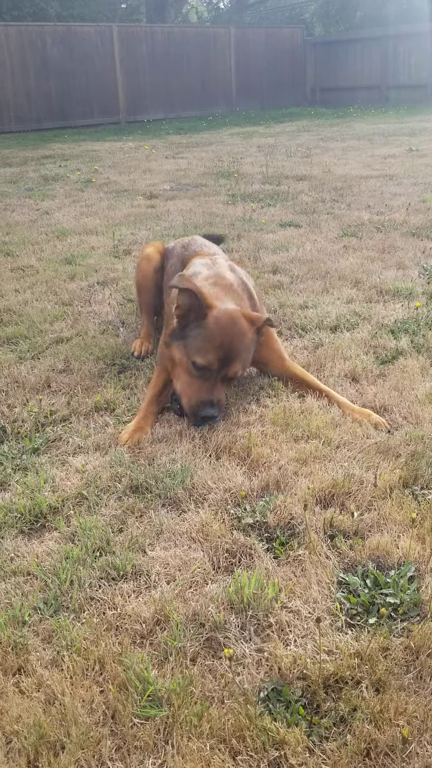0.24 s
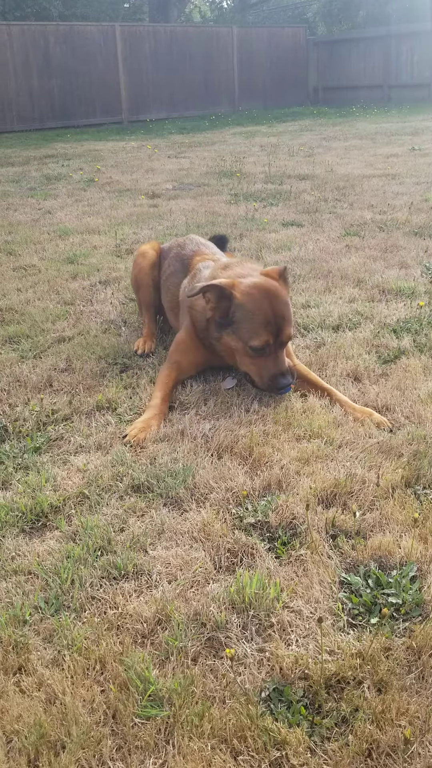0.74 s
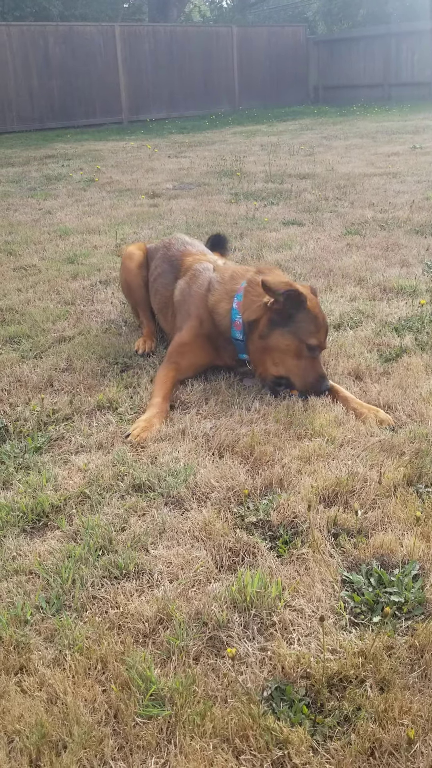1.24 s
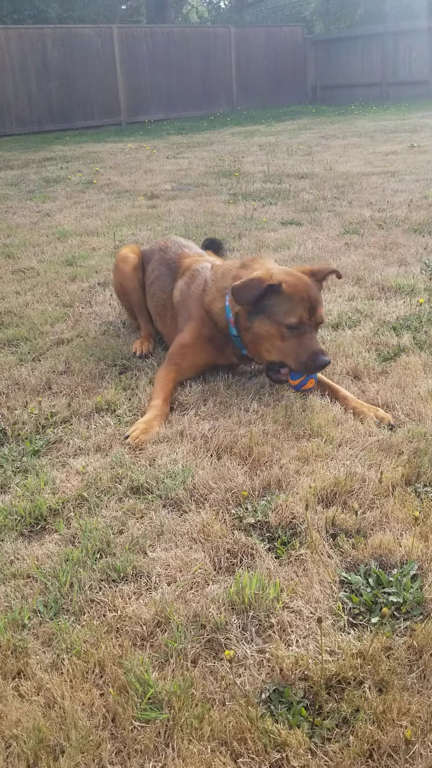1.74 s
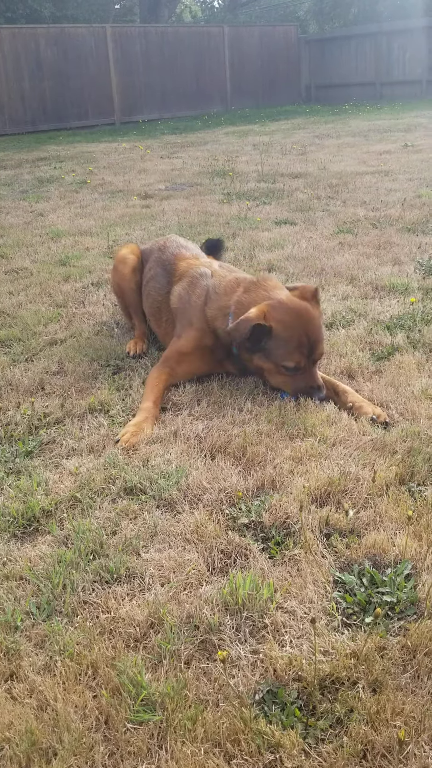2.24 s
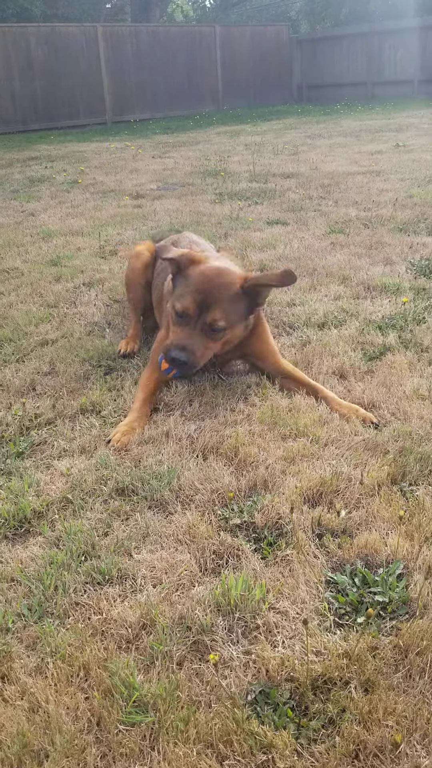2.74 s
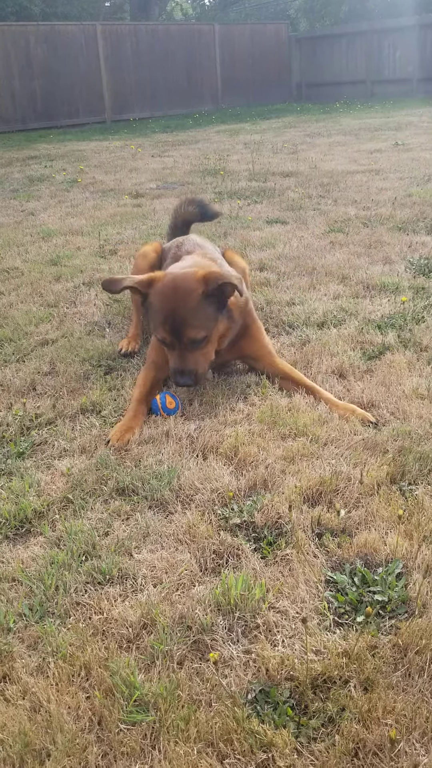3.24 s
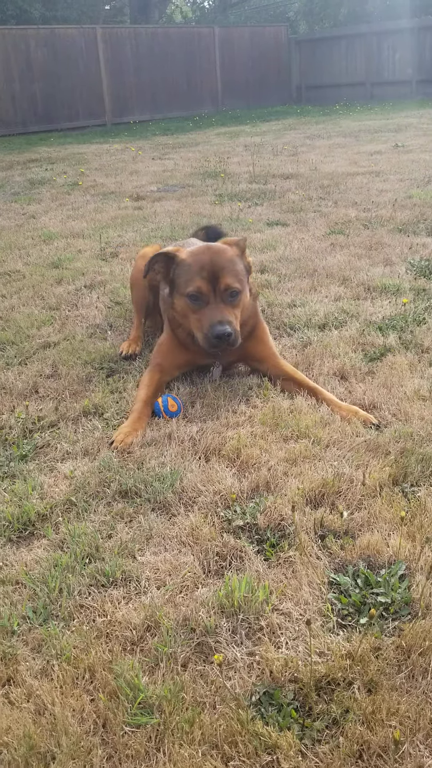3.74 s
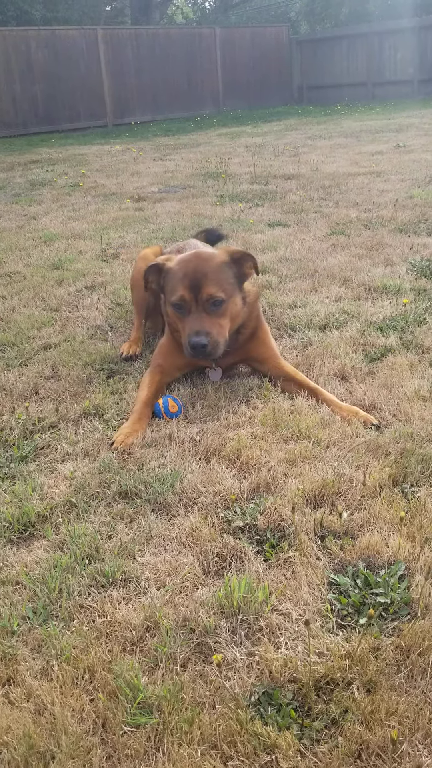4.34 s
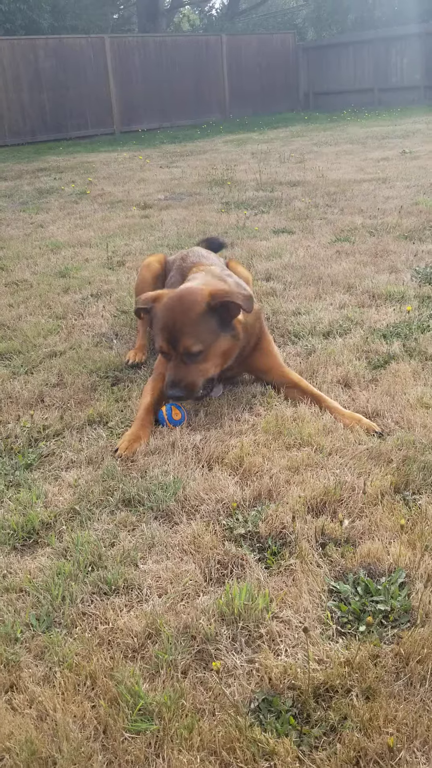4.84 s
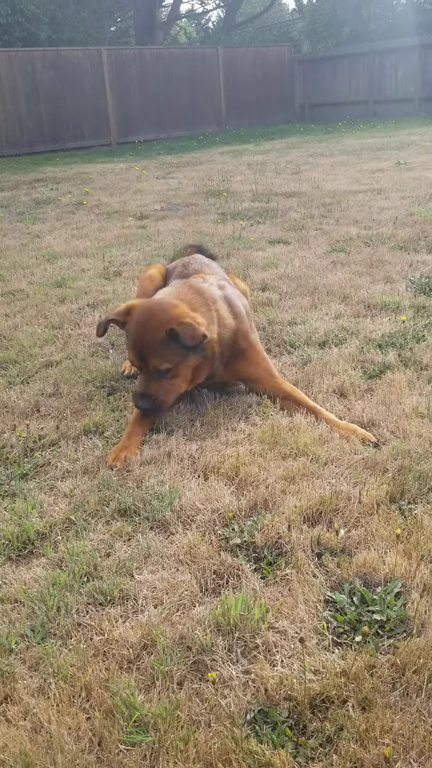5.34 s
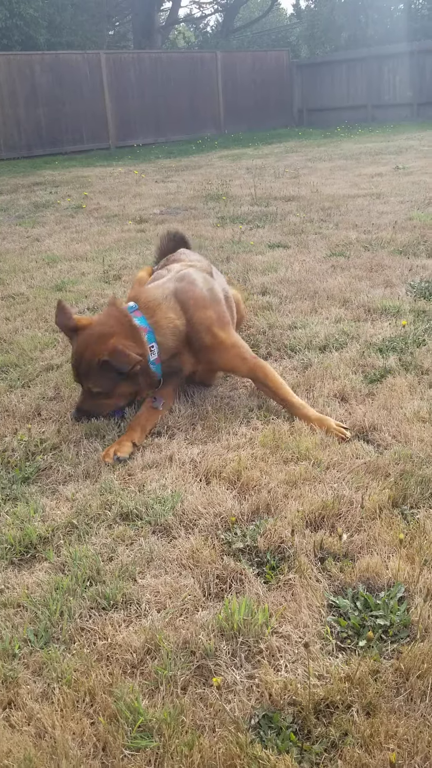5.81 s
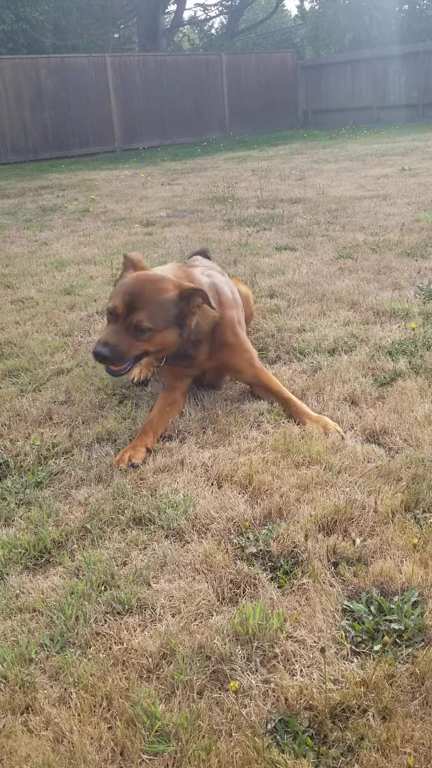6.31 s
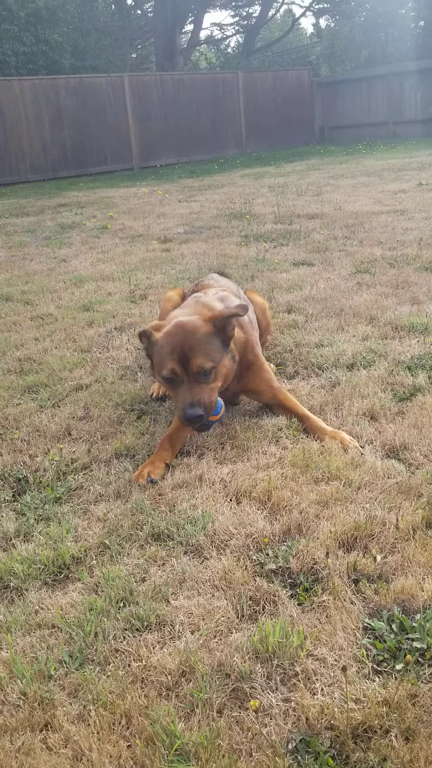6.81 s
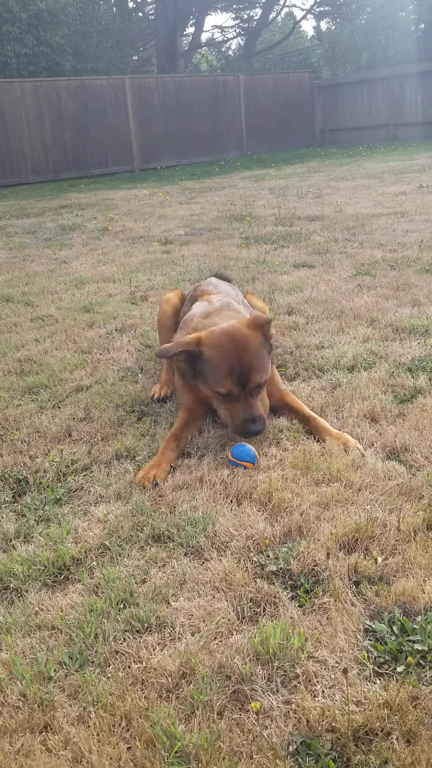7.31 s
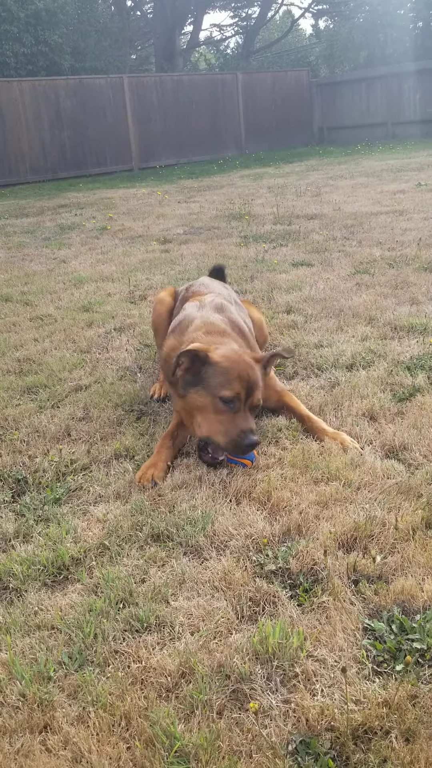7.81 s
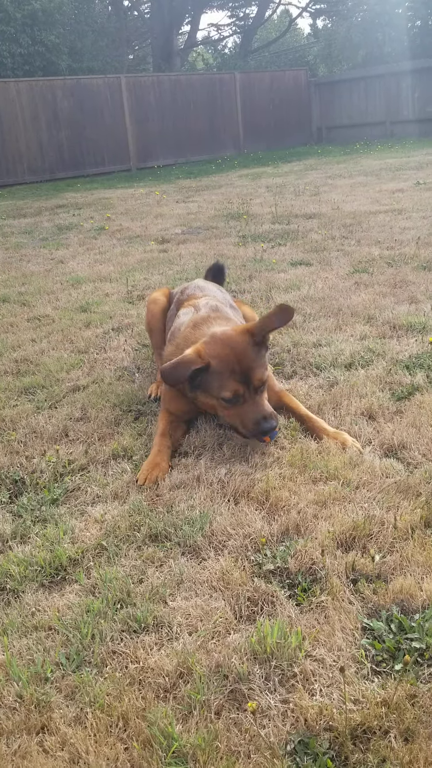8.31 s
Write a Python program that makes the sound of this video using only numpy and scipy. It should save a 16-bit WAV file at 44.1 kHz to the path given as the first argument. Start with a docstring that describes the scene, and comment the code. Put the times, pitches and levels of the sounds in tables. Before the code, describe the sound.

A dog on dry grass chews a rubber squeaker ball in bursts of squeaks and wheezes, collar tags clinking, while a vehicle approaches far behind.

```python
"""Dog with a squeaker ball

A dog lying on a dry lawn chews a rubber squeaker ball. Each bite and release drives air past a reed,
whose pitch slides between a low buzz and a thin whistle, with chatter and wheeze in the same ball.
Two collar tags clink as sums of decaying modes; knocks, snorts and grass are shaped noise.
Behind, a distant vehicle draws nearer with roar, rumble, drone and whine, and gusts bump the microphone."""
import sys
import numpy as np
from scipy import signal
from scipy.fft import rfft, irfft
from scipy.io import wavfile
from scipy.ndimage import uniform_filter1d

SR = 44100
rng = np.random.default_rng(int(sys.argv[2]) if len(sys.argv) > 2 else 0)


def transcribe(signal):
    """Save signal, clipped to [-1, 1], as a 16-bit WAV file at the path in sys.argv[1]."""
    frames = np.atleast_2d(signal).T
    limited = np.clip(frames, -1, 1)
    pcm = np.round(limited * 32767).astype(np.int16)
    wavfile.write(sys.argv[1], SR, pcm)


N = 377496
EDGE_HZ = 16100  # upper limit of the sound
TIME, BINS = np.arange(N) / SR, np.fft.rfftfreq(N, 1 / SR)  # seconds and Hz

# Squeezes and releases of the ball. Each row: start, rise and fall in seconds, flatness of the crest,
# first, crest and last pitch in Hz, relative level of the rise, crest and fall in dB.
STROKES = [(0.811, 0.013, 0.017, 0.52, 2290, 4700, 5400, -41, -41, -33.5),
           (1.122, 0.0052, 0.13, 2.07, 5400, 5330, 2105.0, -41, -42.9, -41.5),
           (1.255, 0.045, 0.089, 1.21, 2182, 4230, 1148.0, -38.7, -44, -36.5),
           (1.586, 0.042, 0.022, 0.6, 1037, 2757, 1315.0, -37.5, -32.5, -39.5),
           (1.655, 0.033, 0.17, 1.6, 1217, 4726.0, 1075.0, -33.5, -32.5, -36.0),
           (2.323, 0.042, 0.023, 1.15, 1270, 4596, 2258.0, -32.5, -33, -35.2),
           (2.484, 0.011, 0.038, 0.66, 1925, 4096, 5500.0, -37.5, -27.5, -36),
           (2.628, 0.0028, 0.0061, 0.92, 3200, 2700, 1900, -36, -42, -42),
           (2.642, 0.03, 0.075, 2.3, 1900, 4860, 3750, -27, -32.5, -36),
           (2.747, 0.008, 0.01, 0.95, 2970, 2580, 1700, -24.5, -13, -27.5),
           (2.767, 0.0353, 0.0357, 0.86, 1326, 1219.0, 1131.0, -16, -26.5, -34.5),
           (5.116, 0.029, 0.031, 1.74, 1303.0, 2198.0, 1304.0, -34.5, -31.5, -32.7),
           (5.168, 0.023, 0.012, 1.4, 1281.0, 2330, 2760.0, -30.6, -32, -33.5),
           (5.201, 0.032, 0.021, 1.04, 1968, 2731.0, 1200.0, -25, -23, -28),
           (5.256, 0.043, 0.047, 1.64, 1257.0, 5240, 1051.0, -26.5, -39.5, -28),
           (5.347, 0.032, 0.029, 1.1, 1517.0, 4863.0, 1289.0, -26, -30.5, -26),
           (5.405, 0.029, 0.046, 1.97, 1220, 4970, 5255.0, -25.0, -34.6, -49),
           (5.479, 0.2624, 0.0676, 0.5, 5170, 4010, 1174.0, -50, -49, -41.5),
           (6.785, 0.0279, 0.028, 0.93, 1266, 1230, 1116.0, -25, -29.5, -27),
           (7.944, 0.021, 0.024, 1.07, 863, 881, 776.0, -23.5, -24.5, -29.5),
           (8.014, 0.03, 0.022, 1.16, 955, 1745, 896.0, -22, -17.5, -21.5),
           (8.069, 0.018, 0.023, 0.85, 1252, 2478.0, 1091.0, -20.5, -24.5, -21.5),
           (8.114, 0.047, 0.016, 1.4, 860, 1125, 999.0, -31.5, -21, -18),
           (8.175, 0.051, 0.018, 0.89, 996, 2523, 1145.0, -21, -27.5, -21),
           (8.245, 0.021, 0.0068, 0.81, 1172.0, 3850.0, 4998.0, -24.2, -30, -27),
           (8.44, 0.069, 0.063, 1, 5357.0, 5050, 5174.0, -45, -37, -38.5)]
# How jaws and lips hold the ball. Each row: valid from in seconds,
# shading in dB at 1.2 kHz, at 5 kHz and at 14 kHz, rasp from 0 to 1.
GRIP = [(.7, 0, 10, 0, 1), (1.0, -5, 2, 8, 0.3), (1.5, 16.5, 2, 15.5, 0.36), (2.2, 1, -1, -6, 1),
        (2.44, -2, 6, -6, 0.9), (2.58, -18, -14.5, -4, 0.07), (5.0, 6, -2, -5, 0.27),
        (5.23, 3, -12, -10, 0.4), (6.5, 7.5, -13.5, -3, 0.01), (7.8, 10, 4.5, 10, 0.4),
        (7.99, 6.5, 7, 6.5, 0.1), (8.35, 0, -6, 7, .2)]


def squeaker(tone_db=0, wheeze_db=-21):
    """Reed excitation: pressure strokes sound the reed, and leaking air wheezes through the same tube."""
    tone, leak = np.zeros((2, N))
    for start, *shape in STROKES:
        grip = [row[1:] for row in GRIP if row[0] <= start][-1]  # the latest hold
        pitch, db = stroke(*shape)
        sound, air = reed(pitch, db, grip)
        add(tone, start, sound)
        add(leak, start, air)
    wheeze = leak * colour(rng.standard_normal(N), TUBE_COLOUR)
    return amp(tone_db) * tone + amp(wheeze_db) * wheeze


# Response of the reed. Each row: pressure from 0 to 1, pitch in Hz, relative loudness in dB.
REED_RESPONSE = [(0.0, 778, -4), (0.111, 1053, -4), (0.29, 1301, -3), (0.382, 1591, -6.5), (0.467, 2149, 3),
                 (0.556, 2627, 2.5), (0.613, 3005, 4.4), (0.667, 3850.0, -5.4), (0.78, 4512, 1.3),
                 (0.886, 5032, -5.5), (0.999, 5390, -12.5)]
CREST_FROM, CREST_FULL = 0.21, 0.92  # shares of the way to the crest pitch where its level takes over
START_S, STOP_S, SLACK_DB = 0.0044, 0.0098, -9  # at low pressure the reed is weak as it starts and stops
SKIP_HZ, SKIP_WIDTH_HZ, SKIP_DB = 3480, 260, -10  # the level dips where the reed skips to the whistle


def stroke(rise, fall, flatness, first_hz, crest_hz, last_hz, rise_db, crest_db, fall_db):
    """Pressure control: an arch of air pressure sets the reed's pitch (Hz) and level (dB)."""
    pressures, pitches, loudness = np.transpose(REED_RESPONSE)
    t = np.arange(-rise, fall, 1 / SR)  # zero at the crest
    rising = t < 0
    arch = np.cos(np.pi / 2 * abs(t / np.where(rising, rise, fall)) ** flatness) ** 2
    foot_hz = np.where(rising, first_hz, last_hz)
    foot_db = np.where(rising, rise_db, fall_db)
    foot_pressure = np.interp(foot_hz, pitches, pressures)
    crest_pressure = np.interp(crest_hz, pitches, pressures)
    pressure = (1 - arch) * foot_pressure + arch * crest_pressure
    pitch = np.interp(pressure, pressures, pitches)
    way = (pitch - foot_hz) / (crest_hz - foot_hz + 1e-6)
    crest = np.interp(way, [CREST_FROM, CREST_FULL], [0, 1])
    skip = np.exp(-((pitch - SKIP_HZ) / SKIP_WIDTH_HZ) ** 2)
    slack = np.exp(-(t + rise) / START_S) + np.exp((t - fall) / STOP_S)
    slack *= 1 - np.clip(2 * pressure, 0, 1)
    db = foot_db + (crest_db - foot_db) * crest + np.interp(pressure, pressures, loudness)
    return pitch, db + SLACK_DB * slack + SKIP_DB * skip


# Colour of the squeaker's tube and ball. Each row: frequency in Hz, relative level in dB.
TUBE_COLOUR = [(800, -13), (1300, -13.5), (1750, -5), (2200, -5.5), (2450, -1), (2720, 0.5), (3050, -4),
               (3400, 0.5), (3850, -17), (4500, -7.5), (5250, -8), (6100, -15.5), (7300, -23.5),
               (8700, -19), (11000, -23.5), (13000, -7), (15000, -17.5)]
# Around this pitch a rasping reed beats strong-weak, which gives half-order lines.
DOUBLING_HZ, DOUBLING_WIDTH_HZ, DOUBLING_DB = 2150, 500, -7


def reed(pitch, db, grip, jitter=0.0061, slide_jitter=0.019, flutter_db=2, rolloff=0.7,
         break_hz=1900, slide_rate=20, ring=2.5, waver_db=1.5):
    """Source and filter: reed partials through the tube, breaking into chatter on low slides; also the leak."""
    low, upper, top, rasp = grip
    n = len(pitch)
    slide = abs(np.gradient(np.log(pitch))) * SR
    unsteady = np.tanh(uniform_filter1d(slide, size=400) / slide_rate)
    # share of the power in chatter
    broken = np.clip(rasp * unsteady / (1 + (pitch / break_hz) ** 10), 0, .95)

    def slow_noise(hz):
        """Low-pass filtering: noise of rms 1 that varies below hz."""
        return unit(signal.lfilter(*signal.butter(2, hz, fs=SR), rng.standard_normal(SR)))[-n:]

    shake, flutter, waver = slow_noise(400), slow_noise(400), slow_noise(50)
    shake_depth = (jitter + slide_jitter * unsteady) * np.minimum(1500 / pitch, 1)  # whistle is steadiest
    pitch = pitch * (1 + shake_depth * shake)
    phase = 2 * np.pi * np.cumsum(pitch) / SR
    order = np.arange(1, 16.5, .5)[:, None]  # harmonics and the half orders between them
    partial_hz = order * pitch
    doubling = np.exp(-((pitch - DOUBLING_HZ) / DOUBLING_WIDTH_HZ) ** 2)
    doubling *= amp(DOUBLING_DB) * np.sqrt(rasp)
    lips = [(1200, low), (2200, 0), (2900, 0), (5000, upper), (14000, top)]  # (Hz, dB)
    partials = amp(at_hz(TUBE_COLOUR, partial_hz) + at_hz(lips, partial_hz)) / order ** rolloff
    partials *= partial_hz < EDGE_HZ
    partials *= np.where(order % 1, doubling, 1)
    tone = (partials * np.sin(order * phase)).sum(0)
    tone = steady(tone + ring * cavity(tone))
    strength = amp(db + flutter_db * unsteady * flutter + waver_db * waver)
    strength *= signal.windows.tukey(n, min(200 / n, 1))
    sound = np.sqrt(1 - broken) * tone + np.sqrt(broken) * chatter(SR // 2)[:n]
    leak = strength * (0.042 + 2 * rasp * unsteady)
    return strength * sound, leak


def chatter(count, slaps_per_s=900, air=.2):
    """Impulsive excitation: irregular slaps of the reed ring the cavity."""
    slaps = ((rng.random(count) < slaps_per_s / SR) + air) * rng.standard_normal(count)
    body = signal.butter(2, [1700, 6000], "band", fs=SR)
    return steady(signal.lfilter(*body, cavity(slaps)))


# Resonances of the ball. Each row: frequency in Hz, width in Hz, relative level in dB.
CAVITY_MODES = [(2117, 80, 0), (2685, 165, 0.5), (4380, 120, 1.5), (5200, 1000, -12)]


def cavity(x):
    """Resonance: modes of the ball ring on after the reed has swept through them."""
    return sum(amp(db) * signal.lfilter(*signal.iirpeak(hz, hz / width, fs=SR), x)
               for hz, width, db in CAVITY_MODES)


# Modes of the small tag. Each row: frequency in Hz, relative level in dB, nominal 60 dB decay in seconds.
SMALL_TAG_MODES = [(8352, 0, .09), (8290, -7, .04), (8430, -6, .04), (14217, -8, .11)]
# Modes of the large tag. Each row: frequency in Hz, relative level in dB, nominal 60 dB decay in seconds.
LARGE_TAG_MODES = [(5385, -18, .2), (7060, -19, .2), (7899, 0, .28), (9970, -20, .16), (12530, -13, .1)]
# High overtones of both tags, which follow the tick level.
# Each row: frequency in Hz, relative level in dB, nominal 60 dB decay in seconds.
TAG_OVERTONES = [(12550, -2.5, 0.054), (13260, -6.5, 0.095), (14217, 0.5, 0.081), (14825, -9, 0.053),
                 (15290, -19, 0.051)]
# The louder clinks. Each row: time in seconds, relative level in dB of small tag, large tag and bright tick.
CLINKS = [(0.1356, -56, -67, -55), (0.7213, -55, -65, -66), (0.741, -55, -70, -67), (0.806, -47, -73, -41),
          (0.909, -56, -77, -44.5), (1.65, -41, -52, -38), (2.1286, -50, -57, -46), (2.8488, -47, -37, -36),
          (2.9382, -54, -55, -46.5), (3.061, -53.5, -47.5, -55), (3.1433, -56, -48, -45),
          (3.1942, -35, -54, -40), (3.3274, -52, -50, -41), (4.8842, -47, -63, -48),
          (4.9464, -59, -72, -44), (5.3577, -54, -51, -61), (5.536, -56, -56, -40), (5.5908, -50, -39, -34),
          (5.6512, -44, -63, -34.5), (5.763, -45, -45, -42), (5.8663, -60, -68, -38.5),
          (5.989, -58, -46, -37.5), (6.104, -48, -38.5, -37), (6.332, -69, -40.5, -42),
          (6.418, -50.5, -67, -63), (6.714, -60, -46, -44), (6.895, -67, -62, -46), (7.25, -60, -59, -51),
          (7.4113, -70, -70, -46)]


def tags(small_db=9.5, large_db=0, overtone_db=-2, tick_db=1, tick_s=0.0045, rebound=0.63, detune=0.00099):
    """Modal ringing: two metal tags strike and rebound once; mode phases differ between the ports."""
    out, t = np.zeros((N, 2)), np.arange(SR // 3)[:, None] / SR
    bright = signal.butter(1, 10500, "high", fs=SR)
    for s, small, large, tick in CLINKS + jingles():
        for delay, force in ((0, 1), (rng.uniform(0.0029, 0.018), rebound)):
            damping = np.exp(rng.normal(0, 0.36))  # the fur presses differently each time
            stretch = 1 + detune * rng.standard_normal()
            noise = signal.lfilter(*bright, rng.standard_normal((len(t), 2)), axis=0)
            clink = amp(tick + tick_db) * noise * np.exp(-t / tick_s)
            for modes, db, shift in ((SMALL_TAG_MODES, small + small_db, stretch),
                                     (LARGE_TAG_MODES, large + large_db, 1),
                                     (TAG_OVERTONES, tick + overtone_db, stretch)):
                for hz, mode_db, t60 in modes:
                    decay = amp(db + mode_db + rng.normal(0, 2) - 60 * damping * t / t60)
                    turns = hz * shift * t + rng.random() + rng.normal(0, 0.11, 2)
                    clink += decay * np.sin(2 * np.pi * turns)
            add(out, s + delay, force * clink)
    return out.T


# Spans of faint jingling while the head swings. Each row: start and end in seconds.
JINGLING = [(5.501, 5.78), (6.2, 6.64)]
JINGLE_DB, JINGLES_PER_S = (-58.5, -59, -47), 14  # mean relative dB of small tag, large tag, bright tick


def jingles(spread_db=4):
    """Random timing: faint clinks scatter about regular slots, as rows like those of CLINKS."""
    slots = np.concatenate([np.arange(start, end, 1 / JINGLES_PER_S) for start, end in JINGLING])
    rows = []
    for slot, chance in zip(slots, rng.standard_normal((len(slots), 4))):
        time = slot + np.tanh(chance[0]) / 2 / JINGLES_PER_S
        rows.append((time, *(JINGLE_DB + spread_db * chance[1:])))
    return rows


# Soft knocks of jaw, ball and paws. Each row: time in seconds, relative level in dB, centre in Hz.
KNOCKS = [(0.194, -24, 229), (0.199, -30.5, 560), (0.878, -36.5, 662), (1.143, -36, 766), (1.17, -38, 633),
          (3.254, -31, 720), (4.084, -33.5, 315)]


def knocks(knock_db=-2, decay_s=0.01, spread=1.26):
    """Heavy damping: a short noise burst in a broad band gives a dull bump."""
    out, t = np.zeros(N), np.arange(SR // 8) / SR
    for s, db, hz in KNOCKS:
        body = signal.butter(2, [hz / spread, hz * spread], "band", fs=SR)
        burst = 5 * rng.standard_normal(len(t)) * np.exp(-t / decay_s)
        add(out, s, amp(db + knock_db) * signal.lfilter(*body, burst))
    return out


# Snorts. Each row: start, attack, hold and release in seconds, relative level in dB.
SNORTS = [(3.115, .05, .025, 0.15, -38.5), (4.13, 0.05, .1, .1, -64), (6.015, .055, 0.051, .075, -41)]
# Colour of the nose. Each row: frequency in Hz, relative level in dB.
NOSE_COLOUR = [(180, -40), (300, -15), (774, -15), (1320, -13), (2610, -4), (3290, -7.5), (3700, -23),
               (4440, -11.5), (6620, -13.5), (7690, -20.5), (13800, -18.5), (16000, -24.5)]


def snorts(snort_db=3, flutter_db=2):
    """Turbulence: air rushes through fluttering nostrils."""
    rush = colour(rng.standard_normal(N), NOSE_COLOUR) * amp(flutter_db * wander(84))
    return amp(snort_db) * rush * swells(SNORTS)


# Shifts of the body in dry grass. Each row: start, attack, hold and release in seconds, relative level in dB.
STIRRING = [(0.02, 0.078, 0.67, 0.43, -63.5), (1.1, 0.19, .03, 0.26, -56.5),
            (1.55, 0.29, 0.23, 0.85, -58.5), (2.6, 0.2, .03, 0.42, -57), (5.3, 0.29, .04, 0.65, -52.5),
            (6.6, 0.38, 0.47, 0.32, -65.5), (7.35, 0.37, 0.043, 1, -58.5), (8.0, 0.17, 0.074, 0.48, -58)]
# Colour of the dry grass. Each row: frequency in Hz, relative level in dB.
GRASS_COLOUR = [(500, -9.5), (1500, -4), (3000, -1), (5500, -0.5), (8000, -4.5), (10500, -7.5),
                (13500, 2.5), (16000, 2)]
# The muzzle brushing through grass. Each row: start, attack, hold and release in seconds, relative level in dB.
NOSING = [(.195, 0.0026, 0.013, .03, -37.5), (.22, 0.03, 0.047, 0.032, -44), (.395, 0.014, .31, .05, -54),
          (4.912, 0.005, .01, 0.079, -52)]
# Colour of the muzzle's brushing. Each row: frequency in Hz, relative level in dB.
MUZZLE_COLOUR = [(200, -5), (500, 5.5), (1200, 3), (2100, 2.5), (3200, -14), (6000, -23), (9000, -15),
                 (16000, -40)]
RESTING_DB = -72.5  # grass under the dog between shifts, on the relative scale of STIRRING


def grass(stir_db=4, nosing_db=0, snaps_per_s=900, size_db=3.0, swish=0.59, clump_db=3.5):
    """Random impulses: dry stalks snap in clumps over a soft swish."""
    sizes = amp(size_db * np.minimum(rng.exponential(1, N), 4.5))
    snaps = (rng.random(N) < snaps_per_s / SR) * sizes
    stalks = (snaps + swish) * rng.standard_normal((2, N)) * amp(clump_db * wander(35))
    stirring = (amp(RESTING_DB) + swells(STIRRING)) * colour(stalks, GRASS_COLOUR)
    nosing = swells(NOSING) * colour(stalks, MUZZLE_COLOUR)
    return amp(stir_db) * stirring + amp(nosing_db) * nosing


# Vehicle noise while far off. Each row: frequency in Hz, relative level in dB.
FAR_COLOUR = [(15, -53), (25, -25.5), (59, -2.5), (78, -5.5), (92, -10), (140, -16.5), (198, -26),
              (229, -22.5), (324, -29.5), (414, -31), (846, -16.5), (1320, -23), (1910, -28), (3440, -45.5),
              (9000, -59.5), (11700, -98.5), (19800, -120)]
# Vehicle noise when closest. Each row: frequency in Hz, relative level in dB.
NEAR_COLOUR = [(15, -52), (25, -43), (59, -1.5), (74, -7.5), (301, -27.5), (394, -22.5), (504, -22.5),
               (826, -9), (1030, -19), (1220, -17), (2270, -29), (3710, -41), (7390, -45), (8160, -52.5),
               (9000, -84), (11700, -90), (19800, -120)]
# Lines of the engine drone. Each row: frequency in Hz, relative level in dB, rms pitch wander in Hz.
DRONE_LINES = [(65.9, 2.5, 1.006), (107.3, -1, 5.4)]
WHINE_HZ = 394.5
CREEP_DB_PER_S = 0.7851  # steady growth of the roar, on top of its one rise


def traffic(roar_db=0.0, rumble_db=1, drone_db=-2, hiss_db=-72, waver_db=1.17):
    """Power crossfade: noise turns from far to near colour; drone and whine rise, over a steady hiss."""
    near, roar, rumble = np.clip((TIME - 3.8) / 3, 0, 1), 0, 0
    for spectrum, share in ((FAR_COLOUR, 1 - near), (NEAR_COLOUR, near)):
        noise = colour(air_pair(), spectrum)
        roar = roar + np.sqrt(share) * band(noise, 250, EDGE_HZ) / band(noise, 550, 1000).std()
        rumble = rumble + np.sqrt(share) * band(noise, 0, 250) / band(noise, 80, 200).std()
    roar = roar * approach(start=3, length=3.5, far_db=-55, near_db=-43)
    roar = roar * amp(roar_db + CREEP_DB_PER_S * TIME + waver_db * wander(18))
    rumble = rumble * approach(start=4.5, length=4, far_db=-53.5, near_db=-41.5) * amp(rumble_db)
    drone = 0
    for hz, db, width in DRONE_LINES:
        strength = amp(db + 2 * wander(4.8))
        drone = drone + strength * np.sin(2 * np.pi * np.cumsum(hz + width * wander(6.5)) / SR)
    drone = drone * approach(start=3.5, length=3, far_db=-57.5, near_db=-42.5) * amp(drone_db)
    whine = np.sqrt(2) * np.sin(2 * np.pi * np.cumsum(WHINE_HZ + 4 * wander(12.6)) / SR)
    whine = whine * approach(start=6.5, length=1.3, far_db=-76.5, near_db=-48.5)
    hiss = amp(hiss_db) * rng.standard_normal((2, N))
    return roar + rumble + drone + whine + hiss


def approach(start, length, far_db, near_db):
    """Level growth: gain moves smoothly from its far to its near level over length seconds."""
    progress = np.sin(np.pi / 2 * np.clip((TIME - start) / length, 0, 1)) ** 2
    return amp(far_db + (near_db - far_db) * progress)


# Likeness of distant sound at the two ports. Each row: frequency in Hz, coherence (held to 1 at most).
AIR_COHERENCE = [(60, 0.83), (130, 1), (290, 0.8), (640, 0.92), (1410, 0.51), (3100, 0.47), (6820, 2),
                 (15000, 2)]
# Balance of distant sound. Each row: frequency in Hz, left minus right in dB.
AIR_BALANCE = [(60, 1.5), (180, 0), (550, 2.5), (1650, 0.5), (4970, 1.5), (15000, -2)]


def air_pair(lag_s=.00009):
    """Partial coherence: noise partly alike at the two ports, reaching the left one first."""
    left, other = rfft(rng.standard_normal((2, N)))
    same = np.clip(at_hz(AIR_COHERENCE, BINS), -1, 1)
    tilt = amp(at_hz(AIR_BALANCE, BINS) / 2)
    delayed = left * np.exp(-2j * np.pi * BINS * lag_s)
    right = same * delayed + np.sqrt(1 - same ** 2) * other
    return irfft(np.array([left * tilt, right / tilt]), N)


# Gusts on the microphone. Each row: start, attack, hold and release in seconds, relative level in dB.
GUSTS = [(2.015, 0.03, 0.056, 0.052, -21.5), (2.152, .02, .01, 0.16, -25.5),
         (2.34, .035, .005, 0.12, -34.5), (5.62, 0.11, .11, .25, -37)]
# Colour of the wind pressure. Each row: frequency in Hz, relative level in dB.
BUFFET_COLOUR = [(12, -46), (20, -22), (43, -1), (91, 0.5), (307, -34.5), (371, -39), (400, -36),
                 (520, -69.5), (880, -120)]


def gusts(left_db=2.5, right_db=-16, lump_db=3):
    """Turbulent pressure: lumpy low-frequency wind noise, mostly on the left port."""
    eddies = colour(rng.standard_normal((2, N)), BUFFET_COLOUR) * amp(lump_db * wander(5.5))
    return amp([[left_db], [right_db]]) * eddies * swells(GUSTS)


# Balance of the dog's sound at the ports. Each row: frequency in Hz, left minus right in dB.
PORT_BALANCE = [(500, 2), (2700, 0.5), (3500, 0.5), (4900, 7), (6500, -1), (8200, -9.5), (9700, 1),
                (12500, -7), (14300, 1.5)]
# Phase of the dog's sound at the ports. Each row: frequency in Hz, lead of the left in radians.
PORT_PHASE = [(2700, 0.72), (3400, 1.2), (3800, 0.9), (4300, -2.5), (5000, -1.52), (6500, -2), (8200, -1.3),
              (12500, -2), (14300, -1.5)]


def ports(x):
    """Interaural-style differences: two microphone ports hear the dog with different colour and phase."""
    balance = amp(at_hz(PORT_BALANCE, BINS))
    phase = np.exp(.5j * at_hz(PORT_PHASE, BINS))
    level = np.sqrt(2 / (1 + balance ** 2))  # keeps the summed power of the ports
    return irfft(rfft(x) * np.array([balance * phase, 1 / phase]) * level, N)


def yard(x, echo_db=-27, t60=0.55, fence_s=0.091, fence_db=-38):
    """Reflection: faint decaying scatter from the lawn and house, and one echo off the fence."""
    t = np.arange(SR // 2) / SR
    taps = rng.standard_normal((2, len(t))) * (rng.random((2, len(t))) < .05)
    taps *= amp(-60 * t / t60) * (t > .004)
    taps *= amp(echo_db) / np.linalg.norm(taps[0])
    taps[:, round(fence_s * SR)] += amp(fence_db)
    dulled = signal.lfilter(*signal.butter(1, 6000, fs=SR), taps)
    return signal.fftconvolve(x, dulled, axes=1)[:, :N]


def swells(rows):
    """Envelope shaping: summed attack, hold and release; the release is the time to fall by 20 dB."""
    total = 0
    for s, attack, hold, release, db in rows:
        onset = np.clip((TIME - s) / attack, 0, 1) ** 2
        fade = amp(-20 * np.maximum(TIME - s - attack - hold, 0) / release)
        total = total + amp(db) * onset * fade
    return total


def wander(rate):
    """Low-pass chance: smooth noise of rms 1, with up to about rate changes a second."""
    return unit(irfft(rfft(rng.standard_normal(N)) * np.exp(-(BINS / rate) ** 2), N))


def colour(x, spectrum):
    """Spectral shaping: gives x a spectrum, at rms 1."""
    return unit(irfft(rfft(x) * amp(at_hz(spectrum, BINS)), N))


def band(x, lo_hz, hi_hz):
    """Band-pass filtering: keeps one band."""
    return irfft(rfft(x) * ((BINS > lo_hz) & (BINS < hi_hz)), N)


def at_hz(points, hz):
    """Interpolation: reads a spectrum on a log-frequency axis."""
    f, value = np.transpose(points)
    return np.interp(np.log(hz + 1), np.log(f + 1), value)


def steady(x):
    """Power levelling: holds the short-time power near 1."""
    return x / np.sqrt(uniform_filter1d(x ** 2, size=220) + 1e-9)


def unit(x):
    """Normalization: scales to rms 1."""
    return x / np.sqrt(np.mean(x ** 2) + 1e-20)


def amp(db):
    """Logarithmic level: decibels to gain."""
    return 10 ** (np.asarray(db) / 20)


def add(mix, s, sound):
    """Superposition: mixes a sound in at s seconds."""
    part = mix[max(round(s * SR), 0):][:len(sound)]
    part += sound[:len(part)]


def scene():
    """Superposition: the dog and its toy in the open yard, with vehicle and wind."""
    dog = squeaker() + tags() + knocks() + snorts() + grass()
    return ports(dog) + yard(dog) + traffic() + gusts()


def record(dry):
    """Band limiting: a linear-phase low-pass removes what lies above EDGE_HZ."""
    lowpass = signal.firwin(401, EDGE_HZ, window=("kaiser", 9), fs=SR)
    return signal.oaconvolve(dry, lowpass[None], "same")


dry = scene()
out = record(dry)
transcribe(out)
```